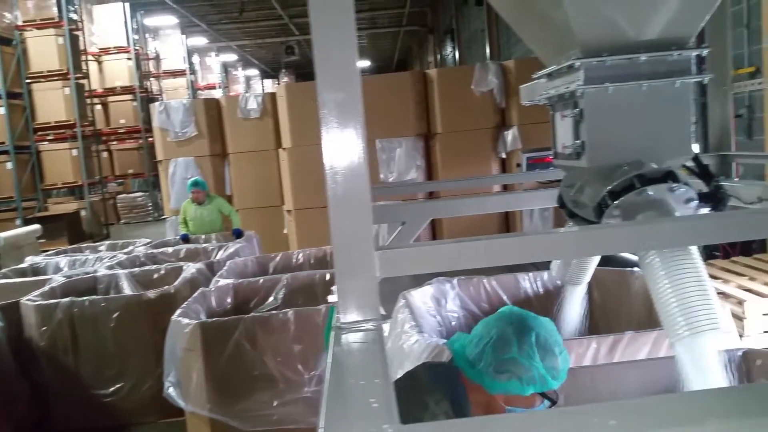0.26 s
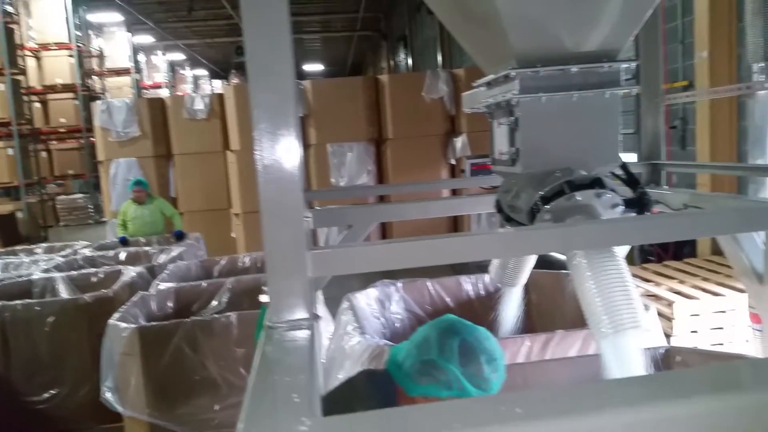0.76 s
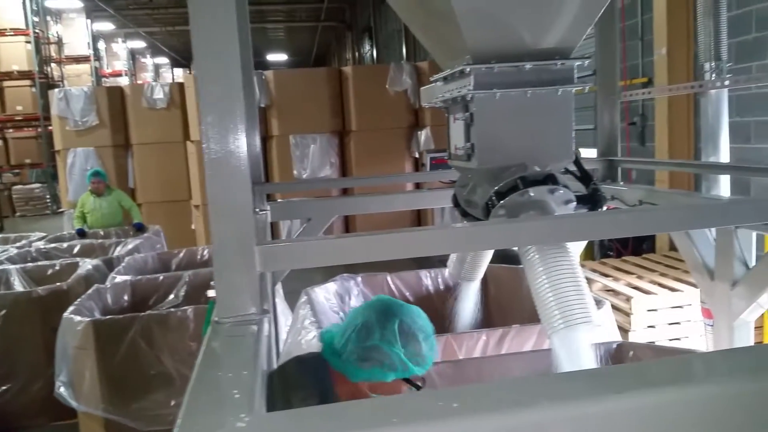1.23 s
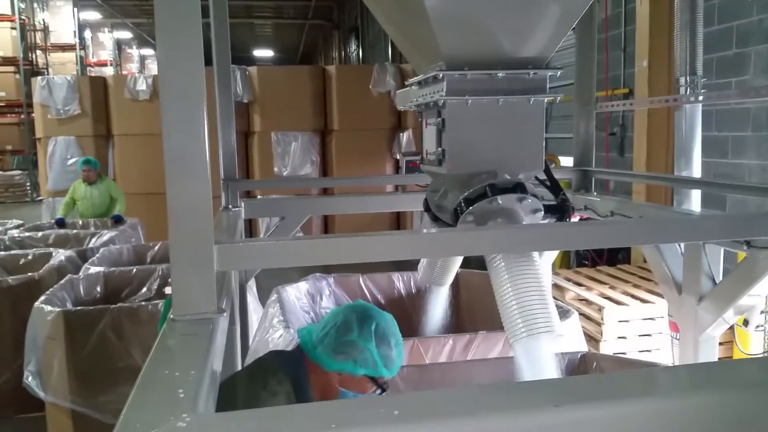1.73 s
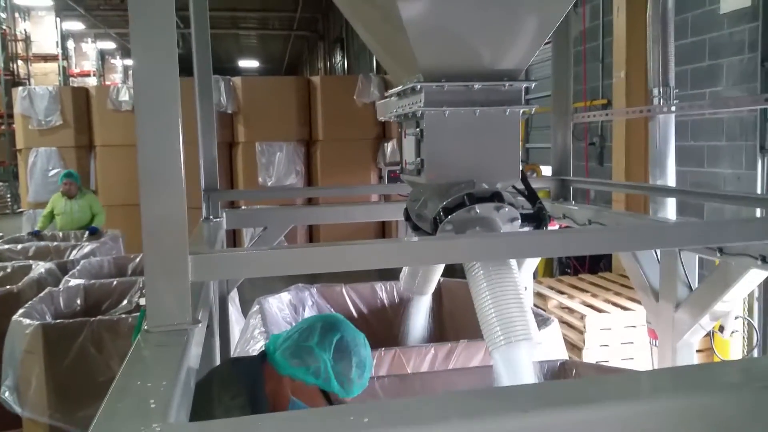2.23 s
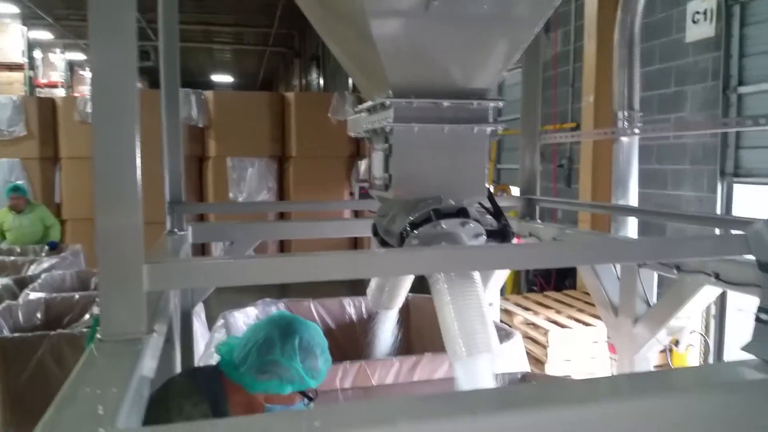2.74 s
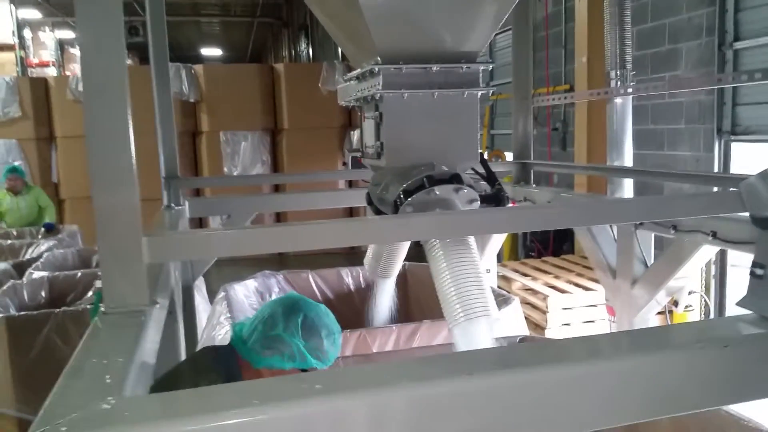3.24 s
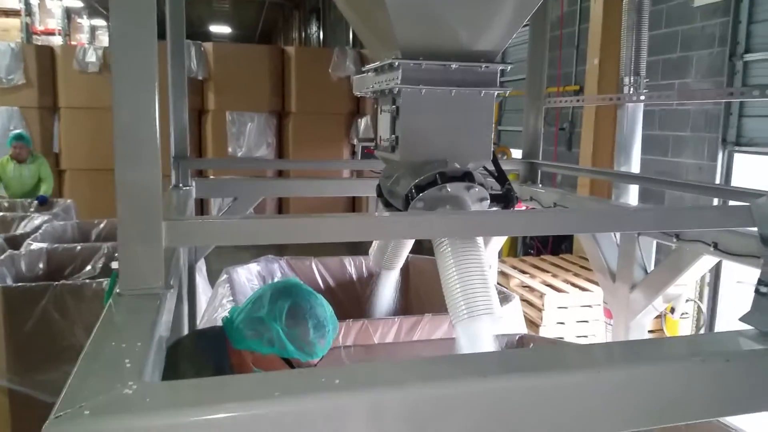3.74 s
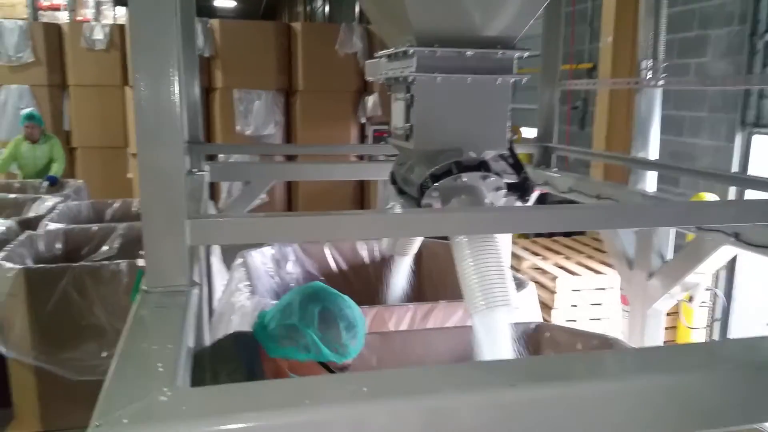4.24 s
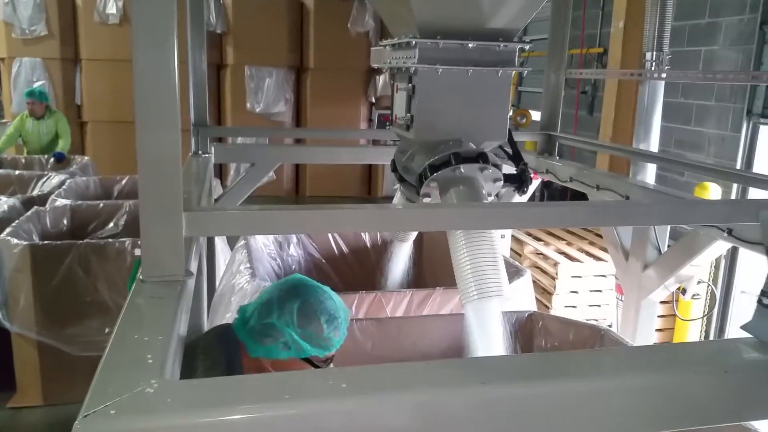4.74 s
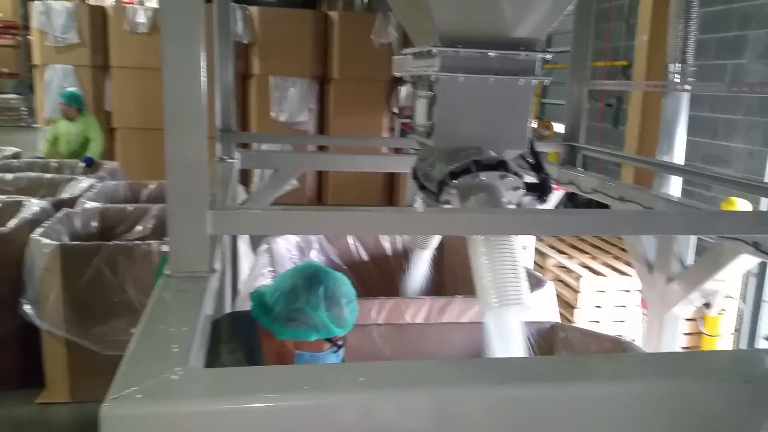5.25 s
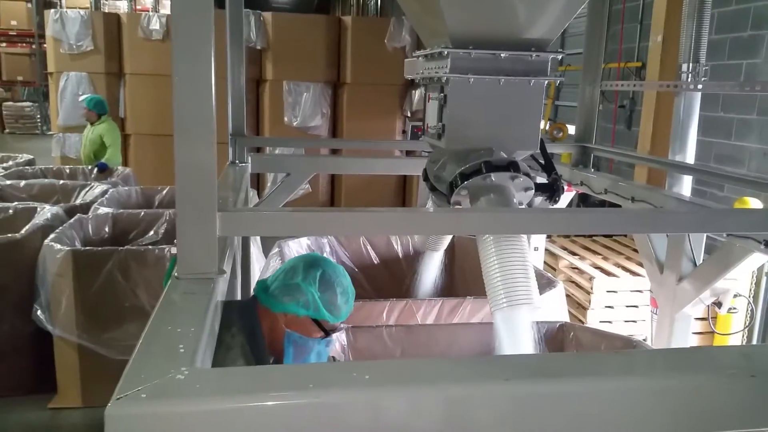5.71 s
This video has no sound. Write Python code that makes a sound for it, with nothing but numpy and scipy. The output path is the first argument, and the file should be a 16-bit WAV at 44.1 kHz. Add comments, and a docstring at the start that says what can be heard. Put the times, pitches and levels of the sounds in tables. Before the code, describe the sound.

Plastic pellets hiss and rattle through a metal pipe into a box, with a high whine, rushing air and blower hum.

```python
"""Plastic pellets stream through a thin metal pipe and set its wall modes singing. They rattle into a
lined box at a warehouse filling station, over a roar of air and the hum and whistle of a blower.
The right side shifts tone slowly; near 2.7 s the left side's midrange dulls quickly, with a brief hissy
rub like a finger brushing the microphone. The hall blurs everything: the sides agree only in the bass."""
import sys
import numpy as np
from scipy import signal
from scipy.fft import rfft, irfft, next_fast_len
from scipy.io import wavfile
from scipy.ndimage import uniform_filter1d, map_coordinates

SR = 44100
rng = np.random.default_rng(int(sys.argv[2]) if len(sys.argv) > 2 else 0)


def waveform_to_disk(signal):
    """Save audio, clipped to [-1, 1], as 16-bit WAV at the path in sys.argv[1]."""
    frames = np.transpose(np.atleast_2d(signal))
    scaled = np.clip(frames, -1, 1) * 32767
    samples = np.round(scaled).astype(np.int16)
    wavfile.write(sys.argv[1], SR, samples)


N = 263718
TIME_S = np.arange(N) / SR


def amp(db):
    return 10 ** (np.asarray(db) / 20)


def at_pitch(table, hz):
    """Each column after the first, interpolated along a log frequency axis."""
    pitch_hz, *columns = np.transpose(table)
    return np.array([np.interp(np.log(hz + 1), np.log(pitch_hz + 1), column) for column in columns])


def wobble(rate_hz):
    """A smooth random curve with rate_hz knots a second."""
    knots = rng.standard_normal(int(N * rate_hz / SR) + 4)
    return map_coordinates(knots, [TIME_S * rate_hz])


def fader(t, start_s, takes_s, from_db, to_db):
    """One level, a straight move, then another level."""
    return np.interp(t, [start_s, start_s + takes_s], [from_db, to_db])


def eq(x, response):
    """Filter x by a complex response(hz)."""
    size = next_fast_len(N + SR // 2)
    return irfft(rfft(x, size) * response(np.fft.rfftfreq(size, 1 / SR)), size)[..., :N]


def moving_eq(x, gain_db):
    """Filter x by a gain_db(hz, t) that moves over time."""
    hz, t, spectrum = signal.stft(x, SR, nperseg=512)
    return signal.istft(spectrum * amp(gain_db(hz, t)), SR, nperseg=512)[1][:, :N]


def patchy_noise(depth_db, bins, frames):
    """Two noises whose gain drifts in patches, bins wide and frames long."""
    def patches_db(hz, t):
        field = rng.standard_normal((len(hz), len(t)))
        field = uniform_filter1d(uniform_filter1d(field, bins, 0), frames, 1)
        return depth_db * field / field.std()
    return moving_eq(rng.standard_normal((2, N)), patches_db)


# Stereo image in the hall: pitch_hz, left_right_coherence, left_lag_rad
HALL_IMAGE = [(30, 0.94, .01), (100, 0.97, .05), (300, 0.7, 0.18), (590, .78, 0.87), (1020, 0.22, 0.62),
              (1530, 0.48, 2.5), (1880, 0.027, 4), (2630, 0.098, 4.63), (2980, 0.048, 6.5),
              (4150, 0.057, 6.2), (4330, 0.42, 6.5), (4640, 0.21, 7.6), (5200, 0.12, 7.3),
              (6160, 0.13, 9.1), (9950, 0.065, 15.35), (14800, 0.14, 20.4)]

def hall_stereo(pair):
    """Blend two unrelated noises at 0 dB per Hz: the hall leaves the bass centred, the treble wide."""
    def width(hz):
        angle = np.arccos(at_pitch(HALL_IMAGE, hz)[0]) / 2
        return np.array([np.cos(angle), np.sin(angle)])
    def lag(hz):
        return np.exp(-0.5j * at_pitch(HALL_IMAGE, hz)[1] * [[1], [-1]])
    rms = np.sqrt(np.mean(pair ** 2, axis=-1, keepdims=True))
    mid, side = eq(pair / rms, width)
    return np.sqrt(SR / 2) * eq(np.array([mid + side, mid - side]), lag)


# Modes of the pipe wall and narrow whistles of the air line: pitch_hz
MODE_HZ = [520, 1421, 2400, 2688, 4285, 4561, 4670, 6030, 6110, 7955, 9850, 10650, 10740, 11900, 15260,
           15383, 15600]
# Their peaks before level moves: width_below_hz, width_above_hz, left_db_per_hz, right_db_per_hz
MODE_PEAKS = [(19, 36, -66.5, -64.5), (31.7, 35, -54.5, -52), (70, 90, -64, -60), (60, 78, -49, -50.5),
              (115, 123, -48.5, -45.5), (25, 15, -49.5, -48), (70, 69, -63, -52), (98, 47, -58, -41),
              (70, 308, -54, -43), (230, 650, -60.5, -57), (340, 980, -64, -62), (40, 43, -63, -55),
              (40, 50, -67, -58), (300, 700, -74, -71), (200, 200, -63, -58), (60, 55, -53, -49),
              (200, 300, -68, -64)]
# The three loudest rings: pitch_hz
LOUD_RING_HZ = [2690, 4300, 6080]
# Their slow swell and sink: time_s, low_gain_db, middle_gain_db, high_gain_db
RING_SWELLS = [(0, 3, 0, 2), (1.5, 0.5, 2, .6), (2.6, -1.8, 2.5, -1.9), (2.75, -2, 0.4, 1.8),
               (3.5, -2, 0, 0.6), (4.2, -0.5, 1.3, 0), (4.6, 1.2, 3.6, 1.6), (5.1, -0.7, 0, 0),
               (5.7, 0, 2, 1.3)]

def pipe_ring():
    """Countless pellet blows keep each wall mode ringing; its lengthwise family trails off above it."""
    def resonances(hz):
        power = 0
        for pitch_hz, (below_hz, above_hz, left_db, right_db) in zip(MODE_HZ, MODE_PEAKS):
            detune = 2 * (hz - pitch_hz) / np.where(hz < pitch_hz, below_hz, above_hz)
            power += amp([[left_db], [right_db]]) ** 2 / (1 + detune ** 2) ** 1.336
        return np.sqrt(power)
    def swell_db(hz, t, reach_hz=400):
        time_s, *gains_db = np.transpose(RING_SWELLS)
        bands = [np.exp(-((hz[:, None] - pitch_hz) / reach_hz) ** 2) for pitch_hz in LOUD_RING_HZ]
        return sum(band * np.interp(t, time_s, db) for band, db in zip(bands, gains_db))
    blows = hall_stereo(patchy_noise(depth_db=0.91, bins=9, frames=6))
    return moving_eq(eq(blows, resonances), swell_db)


# Tone of the roar before level moves: pitch_hz, left_db_per_hz, right_db_per_hz
ROAR_EQ = [(25, -100, -98), (50.6, -77, -76), (137, -78.5, -79), (252, -74.5, -75), (290, -77, -76),
           (403, -71, -73), (483, -71.5, -73), (710, -66.5, -66.5), (1060, -64.5, -63), (1580, -62, -62.5),
           (2500, -61, -60), (3420, -61.5, -59), (4300, -62, -70), (4870, -60, -56.5), (5600, -60, -58),
           (6660, -65.5, -56), (8760, -76.5, -75), (15000, -82, -65)]

def air_roar():
    """Air and pellets rush in a broad bed of noise, smoothed by the hall."""
    rush = hall_stereo(patchy_noise(depth_db=1.0, bins=3, frames=22))
    return eq(rush, lambda hz: amp(at_pitch(ROAR_EQ, hz)))


# Tone of the plastic liner before level moves: pitch_hz, left_db_per_hz, right_db_per_hz
LINER_EQ = [(4000, -102, -91.5), (7040, -80, -64), (9000, -67.5, -67.5), (11600, -66.5, -62.5),
            (14300, -67, -65.5), (16000, -65, -68)]
# Level ride of the rattle: time_s, gain_db
RATTLE_RIDE = [(0, -.2), (1, 0), (1.4, -2.3), (2.4, -1.1), (2.9, -0.5), (3.5, 1.5), (4.1, 0.2), (4.5, 2.3),
               (5.35, 0), (5.8, 1.5)]

def liner_rattle():
    """Pellets hit the liner in clumps of dense, uneven ticks."""
    sizes = amp(1.8 * rng.standard_exponential((2, N)))
    ticks = hall_stereo(sizes * rng.standard_normal((2, N)))
    clumps = amp(0.35 * wobble(6) + 0.7 * wobble(22))
    ride_db = np.interp(TIME_S, *np.transpose(RATTLE_RIDE))
    return amp(ride_db) * clumps * eq(ticks, lambda hz: amp(at_pitch(LINER_EQ, hz)))


# Partials of the hum, before the lowest one's fader: shaft_multiple, rms_level_db
HUM_PARTIALS = [(4, -64), (5, -58), (6, -60), (8, -55.5), (10, -55.5), (12, -57), (14, -54)]

def blower_hum(shaft_hz=73.9, drift=0.00119, waver_db=2.0):
    """Lobes on a slightly unsteady shaft hum; each partial wavers in the hall, the lowest steps up late."""
    turns = np.cumsum(shaft_hz * (1 + drift * wobble(2.99))) / SR
    partials = []
    for multiple, level_db in HUM_PARTIALS:
        peak = np.sqrt(2) * amp(level_db + waver_db * wobble(7))
        partials.append(peak * np.sin(2 * np.pi * (multiple * turns + rng.random())))
    partials[0] *= amp(fader(TIME_S, start_s=4.55, takes_s=0.2, from_db=-2, to_db=5.5))
    return sum(partials)


# How much of each side's level move a band takes: pitch_hz, left_share, right_share, left_delay_s
SHADE_BANDS = [(300, 0.099, 0.26, 0.087), (900, 0.24, 0.17, 0.23), (1520, 0.71, 0.69, 0),
               (2120, 1.03, 0.65, 0.029), (2540, 1.27, -0.26, 0.015), (3400, 0.73, -0.0061, 0),
               (4300, 0.95, -0.75, 0), (5100, 0.27, -0.053, 0), (6340, 0.52, -0.084, .4),
               (7950, 0.14, 0.43, 0.48), (12000, 0.013, -0.3, 0), (15400, 0.21, 0.4, 0)]

def port_shade_db(hz, t):
    """The left side's midrange dulls quickly near 2.7 s; the right shifts tone slowly, earlier."""
    left_share, right_share, left_delay_s = at_pitch(SHADE_BANDS, hz)[:, :, None]
    left = left_share * fader(t - left_delay_s, start_s=2.57, takes_s=0.3, from_db=6, to_db=-0.5)
    right = right_share * fader(t, start_s=0.97, takes_s=0.98, from_db=3, to_db=-2.2)
    return np.array([left, right])


def mic_rub_gain(centre_s=2.7, half_width_s=0.2, boost_db=5):
    """A brief hissy rub on the left microphone, like a brushing finger, as that side dulls."""
    bump = np.exp(-((TIME_S - centre_s) / half_width_s) ** 4)
    return amp(boost_db * bump * [[1], [0]])


def scene():
    """Ring, roar and rattle share the tone shifts and a slightly uneven flow; the hum sits centred."""
    flow_db = 0.32 * wobble(3.075)
    stream = pipe_ring() + air_roar() + liner_rattle() * mic_rub_gain()  # the rub borrows the rattle's hiss
    shaded = moving_eq(stream, lambda hz, t: port_shade_db(hz, t) + np.interp(t, TIME_S, flow_db))
    return shaded + blower_hum()


def record(dry, ceiling=0.95, top_hz=15740):
    """The loudest peaks round off softly, then everything above top_hz is cut."""
    soft = dry / (1 + np.abs(dry / ceiling) ** 6) ** (1 / 6)
    return eq(soft, lambda hz: hz < top_hz)


dry = scene()
out = record(dry)
waveform_to_disk(out)
```